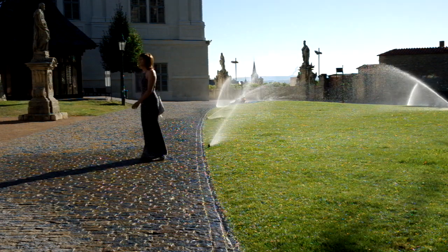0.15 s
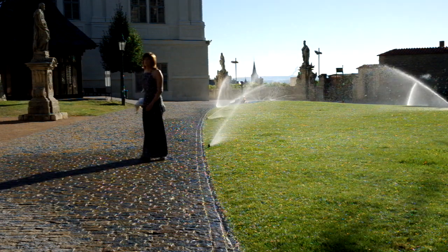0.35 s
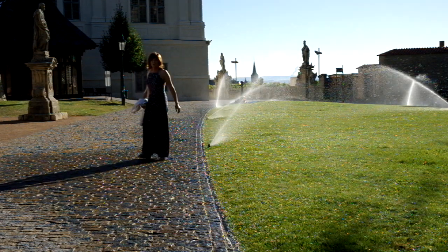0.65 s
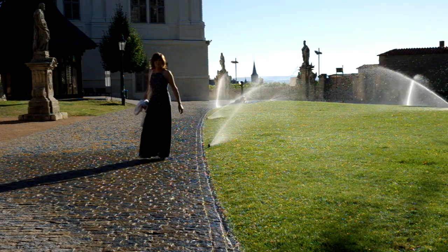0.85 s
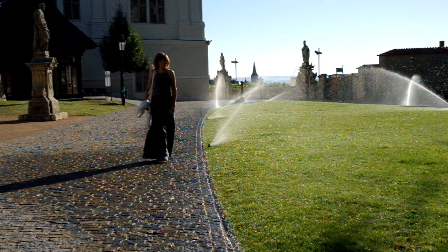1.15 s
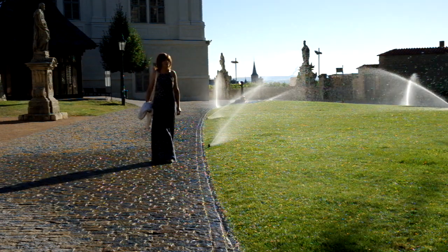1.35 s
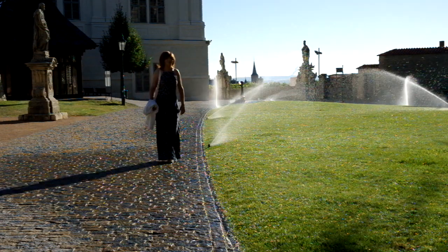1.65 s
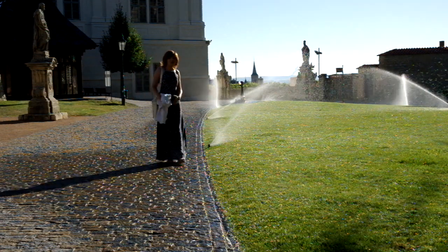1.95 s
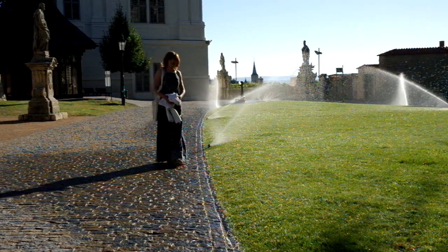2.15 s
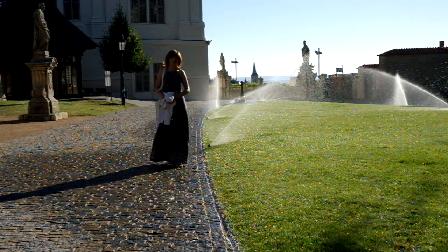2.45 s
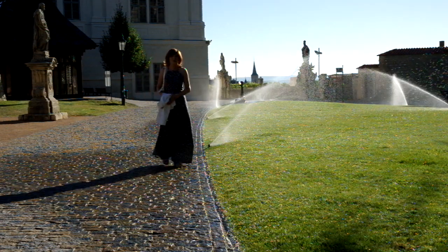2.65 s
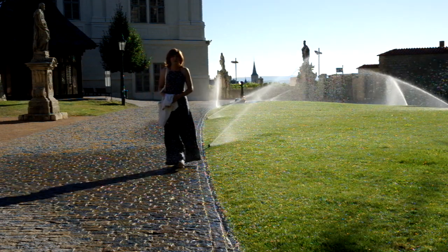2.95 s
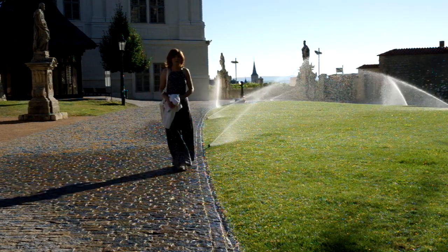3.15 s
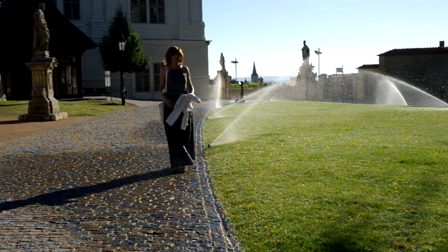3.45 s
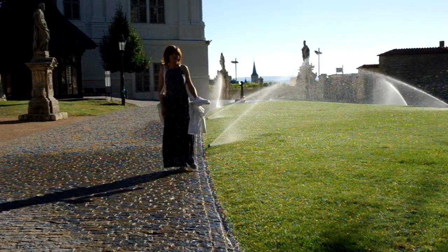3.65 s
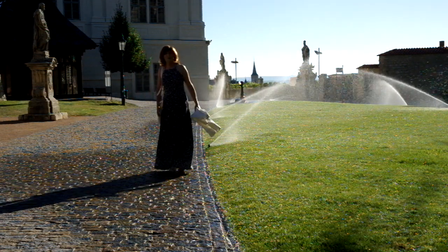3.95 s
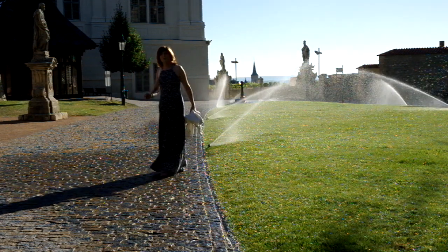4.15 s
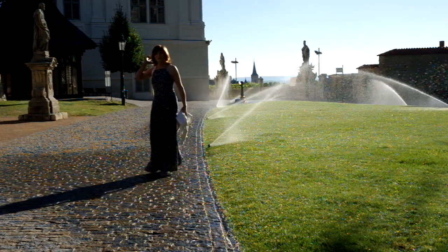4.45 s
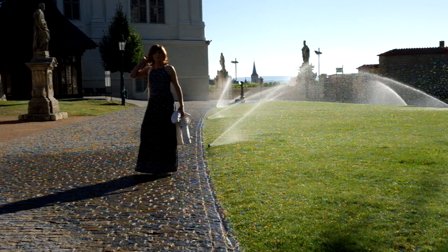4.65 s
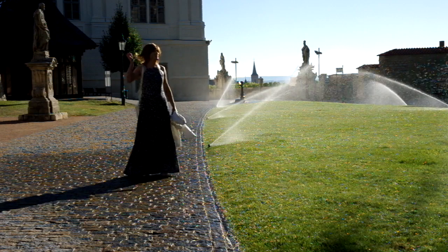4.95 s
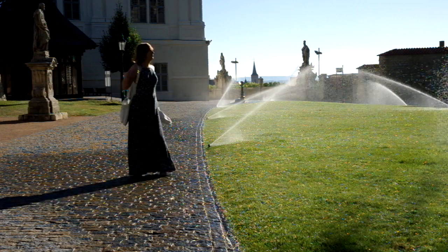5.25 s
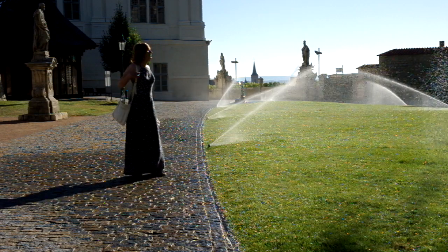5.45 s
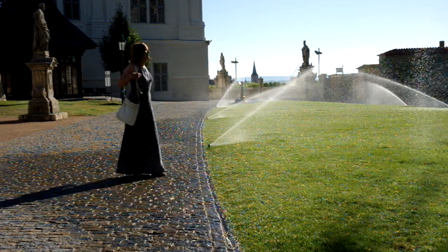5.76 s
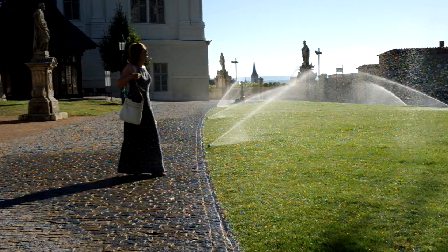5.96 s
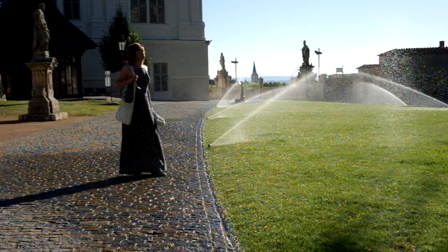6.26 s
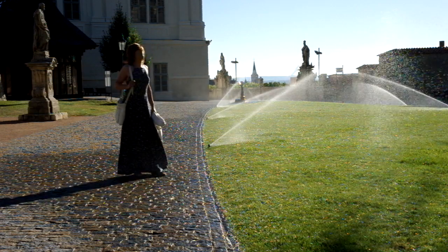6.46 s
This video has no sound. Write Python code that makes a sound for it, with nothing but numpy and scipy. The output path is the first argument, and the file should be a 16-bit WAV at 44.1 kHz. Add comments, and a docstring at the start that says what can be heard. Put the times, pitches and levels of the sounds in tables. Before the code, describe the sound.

Lawn sprinklers hiss steadily while shoes crunch grit on cobbles and a small bird chirps over faint town noise.

```python
"""Sprinklers in a quiet park

Lawn sprinklers hiss steadily, their drops pattering on the grass, over far town noise and a low,
fluttering hum. Shoes crack and scuff grit on the wet cobbles beside the lawn. A hollow rush swells
briefly in the distance, a small bird whistles a run of dipping chirps, and the microphone takes
a few soft bumps."""
import sys
import numpy as np
from scipy import signal
from scipy.fft import rfft, irfft, next_fast_len
from scipy.io import wavfile
from scipy.ndimage import uniform_filter1d

SR = 44100
rng = np.random.default_rng(int(sys.argv[2]) if len(sys.argv) > 2 else 0)


def digitize_waveform(pressure):
    """Quantize a signal to 16-bit integers and store it at the path in sys.argv[1].

    Rows of a 2-D input are taken as channels; values are limited to [-1, 1].
    """
    field = np.atleast_2d(pressure).T
    bounded = np.clip(field, -1, 1)
    quanta = np.round(bounded * 32767).astype(np.int16)
    wavfile.write(sys.argv[1], SR, quanta)


N = 291942
TIME = np.arange(N) / SR


def from_db(db):
    """Decibels to gain."""
    return 10 ** (np.asarray(db) / 20)


def rms_one(x):
    """Scale to rms 1."""
    return x / np.sqrt(np.mean(x ** 2) + 1e-20)


def automation(rows):
    """Breakpoints (time, values...) to one curve per value, at every sample."""
    times, *columns = np.transpose(rows)
    return [np.interp(TIME, times, column) for column in columns]


def drift(rate_hz):
    """Slow random wandering, spread 1."""
    step, settle = 40, 2000
    pole = np.exp(-2 * np.pi * rate_hz * step / SR)
    noise = rng.standard_normal(N // step + settle + 2)
    slow = signal.lfilter([1], [1, -2 * pole, pole * pole], noise)[settle:]
    return np.interp(np.arange(N) / step, np.arange(len(slow)), rms_one(slow))


def equalise(x, spectrum):
    """Shape a steady sound with an EQ curve; rms 1."""
    hz, db = np.transpose(spectrum)
    size = next_fast_len(N)
    bins_hz = np.maximum(np.arange(size // 2 + 1) * SR / size, 1)
    gain = from_db(np.interp(np.log(bins_hz), np.log(hz), db))
    return rms_one(irfft(rfft(x, size) * gain, size)[:N])


def band(x, hz, octaves, order=2):
    """Resonant band around hz; rms 1."""
    edges = [hz / 2 ** (octaves / 2), min(hz * 2 ** (octaves / 2), .45 * SR)]
    return rms_one(signal.sosfilt(signal.butter(order, edges, "band", fs=SR, output="sos"), x))


def impacts(per_s, spread_db, size):
    """Tiny impacts at random moments, most weak and a few strong; rms 1."""
    strength = from_db(spread_db * np.minimum(rng.exponential(1, size), 6))
    hits = rng.random(size) < per_s / SR
    return rms_one(hits * strength * rng.choice([-1, 1], size) + 1e-18)


def add(out, at_s, sound):
    """Mix a sound in at the given time."""
    start = max(round(at_s * SR), 0)
    out[start:start + len(sound)] += sound[:N - start]


# Tone of the spray: (frequency [Hz], relative level [dB])
SPRAY_EQ = [(500, -15), (1100, -3.5), (1720, -4.5), (2500, -2), (3600, -3), (4100, -5.5), (4600, -7),
            (5400, -5.5), (6100, -3), (8600, -3), (9500, -4.5), (10000, -6.5), (10500, -6.5), (12900, -9.5)]
# Slow swing of the jets, before the trims: (time [s], hiss level [dB], mist level [dB])
JET_SWING = [(0.05, -60, -60.5), (0.77, -60, -61), (2.08, -60, -60.5), (2.29, -60.5, -60.5),
             (3.44, -59.5, -59), (4.88, -60, -59.5), (5.32, -58, -57.5), (5.66, -59, -59.5),
             (6.55, -59.5, -59.5)]


def sprinklers(drop_db=-7.0, flutter_db=0.64, mist_hz=5500, mist_trim_db=-0.76, hiss_trim_db=-0.5):
    """Smooth jet hiss plus drops landing on the grass; the finest mist has its own swing."""
    hiss_db, mist_db = automation(JET_SWING)
    jets = rng.standard_normal(N)
    drops = from_db(drop_db) * impacts(per_s=2500, spread_db=2.5, size=N)
    water = equalise(jets + drops, SPRAY_EQ)
    mist = signal.sosfiltfilt(signal.butter(2, mist_hz, "high", fs=SR, output="sos"), water)
    hiss_gain = from_db(hiss_db + hiss_trim_db + flutter_db * drift(rate_hz=11.4))
    mist_gain = from_db(mist_db + mist_trim_db + flutter_db * drift(rate_hz=9.2))
    return hiss_gain * rms_one(water - mist) + mist_gain * rms_one(mist)


# Tone of the far town: (frequency [Hz], relative level [dB])
TOWN_EQ = [(15, -2), (45, 2), (90, -5), (145, -11), (270, -6), (420, -5), (600, -3.5), (800, -5),
           (1200, -10.5), (1700, -15.5), (3500, -44)]


def town(level_db=-61):
    """The far town blurs into a steady, dark bed of noise."""
    return from_db(level_db) * equalise(rng.standard_normal(N), TOWN_EQ)


def hum(throb_hz=33.13, throb_db=-73.0, uneven_db=9.0, dull_hz=160, tone_hz=197.8, tone_db=-78,
        sizzle_hz=10000, sizzle_db=-76, sizzle_s=0.0076):
    """A faint low flutter of uneven pulses, each with a thin high sizzle, around one steady tone."""
    pulses = np.diff(np.floor(TIME * throb_hz), prepend=0)
    pulses *= from_db(uneven_db * np.clip(rng.standard_normal(N), -2, 1.5))
    low_band = signal.butter(2, [22, dull_hz], "band", fs=SR, output="sos")
    flutter = rms_one(signal.sosfilt(low_band, pulses))
    since_pulse_s = TIME % (1 / throb_hz)
    sizzle = band(rng.standard_normal(N) * np.exp(-since_pulse_s / sizzle_s), sizzle_hz, octaves=0.042)
    tone = np.sqrt(2) * np.sin(2 * np.pi * tone_hz * TIME)
    return from_db(throb_db) * flutter + from_db(sizzle_db) * sizzle + from_db(tone_db) * tone


def crush(length_s, hz, octaves, attack_s=0.00057):
    """Grit breaks in a noise burst of a few milliseconds, ringing around hz."""
    t = np.arange(4096) / SR
    force = (1 - np.exp(-t / attack_s)) * np.exp(-(t / length_s) ** 2)
    ring = band(force * rng.standard_normal(len(t)), hz, octaves, order=1)
    return ring * np.sqrt(np.mean(force ** 2))


def crumble(decay_s, hz=1390):
    """Fine grains give way in a short tail after a crack."""
    t = np.arange(4096) / SR
    grains = impacts(per_s=2500, spread_db=1.0, size=len(t))
    return np.exp(-t / decay_s) * band(grains, hz, octaves=1.36)


# Grit cracking underfoot: (time [s], crunch level [dB], crunch ring [Hz], snap level [dB],
# snap ring [Hz], snap length [s], gap to second crack [s], second crack against first [dB])
GRIT_CRACKS = [(0.368, -58, 2800, -55.5, 8400, 0.0047, 0.0086, 1),
               (0.48, -47.5, 1880, -46.5, 8460, 0.0033, 0.015, 1),
               (0.714, -54.5, 1600, -64, 8400, .004, .012, -14),
               (1.309, -54, 2400, -58, 8400, .004, 0.0062, 3),
               (1.875, -49, 2900, -55, 8400, .0035, 0.013, -14),
               (3.291, -46.5, 1990, -54, 8400, .0014, .012, -15),
               (4.151, -52, 2600, -57, 8400, 0.0022, 0.0089, 4),
               (4.841, -45, 2320, -47, 6000, 0.0042, 0.016, -4.5),
               (5.137, -53, 3300, -49, 9500, 0.0031, .015, 1.5),
               (5.278, -46, 1750, -46, 5600, 0.0024, 0.011, -0.5),
               (5.406, -59, 2200, -47, 8400, .004, 0.01, -16)]


def shoe_cracks(crumble_db=-6):
    """A shoe cracks grit twice in quick succession: a dull crunch, a bright snap and a crumbling tail."""
    out = np.zeros(N)
    for at_s, crunch_db, crunch_hz, snap_db, snap_hz, snap_s, gap_s, second_db in GRIT_CRACKS:
        for start_s, db in ((at_s, 0), (at_s + gap_s, second_db)):
            crunch = crush(1.23 * snap_s, crunch_hz, octaves=0.97)
            tail = from_db(crumble_db) * crumble(decay_s=2.9 * snap_s)
            snap = crush(snap_s, snap_hz, octaves=0.25)
            add(out, start_s, from_db(db + crunch_db) * (crunch + tail) + from_db(db + snap_db) * snap)
    return out


# Scuffs on the cobbles: (centre time [s], swell half-width [s], level [dB], ring [Hz])
SOLE_SCUFFS = [(0.447, 0.025, -65, 2000), (5.188, 0.045, -61, 3180), (5.296, 0.022, -57.5, 1570),
               (5.348, 0.059, -61, 1870)]


def shoe_scuffs():
    """A sole slides over fine grains, rasping as the pressure rises and falls."""
    out = np.zeros(N)
    for centre_s, half_s, db, hz in SOLE_SCUFFS:
        pressure = np.exp(-np.linspace(-2, 2, round(4 * half_s * SR)) ** 2)
        grains = impacts(per_s=3200, spread_db=4.5, size=len(pressure))
        add(out, centre_s - 2 * half_s, from_db(db) * pressure * band(grains, hz, octaves=0.84))
    return out


# Swell of the distant rush: (time [s], level [dB])
RUSH_SWELL = [(0.66, -70), (0.764, -69), (0.892, -62), (1.166, -76), (1.24, -58.5), (1.464, -62),
              (1.604, -59), (1.628, -64), (1.746, -53.5), (1.796, -58.5), (2.3, -73)]


def hollow_rush(hz=428, fade_db_per_s=110):
    """A narrow band of noise swells unevenly, fading off at both ends of its curve."""
    outside_s = np.abs(TIME - np.clip(TIME, RUSH_SWELL[0][0], RUSH_SWELL[-1][0]))
    level_db = automation(RUSH_SWELL)[0] - fade_db_per_s * outside_s
    return from_db(level_db) * band(rng.standard_normal(N), hz, octaves=0.32)


def whistle(knots_s, pitch_hz, level_db, waver_db=2.5):
    """A pure note glides through a few pitches, its level wavering."""
    t = np.arange(round(knots_s[-1] * SR)) / SR
    hz = uniform_filter1d(np.interp(t, knots_s, pitch_hz), size=220)
    waver = rms_one(uniform_filter1d(rng.standard_normal(len(t)), size=300))
    gain = from_db(np.interp(t, knots_s, level_db) + waver_db * waver)
    return np.sqrt(2) * gain * np.sin(2 * np.pi * np.cumsum(hz) / SR)


# The bird's run of chirps: (time [s], held pitch [Hz], hold [s], level [dB])
BIRD_CHIRPS = [(0.737, 5000, 0.017, -54.5), (1.087, 4990, 0.015, -56), (1.419, 4730, 0.042, -57),
               (1.776, 4690, 0.064, -61.5), (2.135, 4680, 0.046, -58.5), (2.539, 4670, 0.081, -60),
               (2.933, 3470, 0.037, -62)]
# Quick downward flicks between chirps: (time [s], level [dB])
BIRD_FLICKS = [(1.526, -60), (1.874, -59.5), (2.236, -61), (2.640, -60), (2.912, -65)]


def bird(dive_s=0.014, fall_s=0.02, flick_s=0.023, fade_db_per_s=135):
    """Each chirp dives onto a held pitch, lifts a little and drops away; short flicks fall in between."""
    out = np.zeros(N)
    for at_s, hz, hold_s, db in BIRD_CHIRPS:
        knots_s = np.cumsum([0, dive_s / 2, dive_s / 2, hold_s / 2, hold_s / 2, fall_s])
        pitch_hz = hz * np.array([1.6, 1.11, 0.995, 1.023, 0.99, 1])
        pitch_hz[-1] -= 3020 * np.exp(-hold_s / 0.019)  # the longer the hold, the smaller the fall
        fade_db = fade_db_per_s * hold_s
        level_db = db - np.array([10, 2, 0, fade_db / 2, fade_db, fade_db + 8])
        add(out, at_s, whistle(knots_s, pitch_hz, level_db))
    for at_s, db in BIRD_FLICKS:
        add(out, at_s, whistle([0, flick_s / 2, flick_s], [6100, 5000, 4100], [db - 2, db, db - 4]))
    return out


def with_wall_echoes(sound, wall_db=-23, decay_db_per_s=79):
    """Walls return faint early echoes, the later ones weaker."""
    echoes = np.zeros(N)
    for delay_s in rng.uniform(0.022, 0.073, size=8):
        add(echoes, delay_s, sound * from_db(wall_db - decay_db_per_s * delay_s))
    return sound + echoes


# Soft knocks on the microphone: (time [s], level [dB], pitch [Hz], time to fall 60 dB [s])
MIC_BUMPS = [(1.908, -45, 80, 0.035), (2.041, -40, 85, 0.033), (4.414, -47, 76, 0.086),
             (4.432, -43, 78, 0.056)]


def mic_bumps(attack_s=0.0006):
    """Each bump on the microphone is a low thud that dies in a few cycles."""
    out, t = np.zeros(N), np.arange(8192) / SR
    for at_s, db, hz, t60 in MIC_BUMPS:
        envelope = from_db(db - 60 * t / t60) * (1 - np.exp(-t / attack_s))
        add(out, at_s, envelope * np.sin(2 * np.pi * hz * t))
    return out


def scene():
    """The mono mix, heard from the edge of the lawn."""
    bed = sprinklers() + town() + hum()
    events = shoe_cracks() + shoe_scuffs() + hollow_rush() + with_wall_echoes(bird()) + mic_bumps()
    return (bed + events)[None]


def record(dry, cutoff_hz=12800, dc_offset=-0.0446):
    """The top is cut steeply, and the signal rests a little off zero."""
    high_cut = signal.ellip(12, .1, 80, cutoff_hz, fs=SR, output="sos")
    return signal.sosfilt(high_cut, dry) + dc_offset


dry = scene()
out = record(dry)
digitize_waveform(out)
```